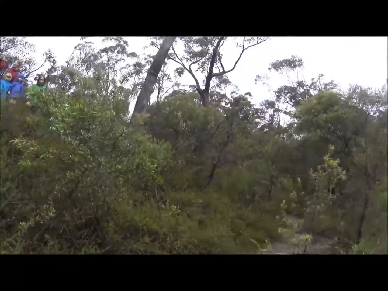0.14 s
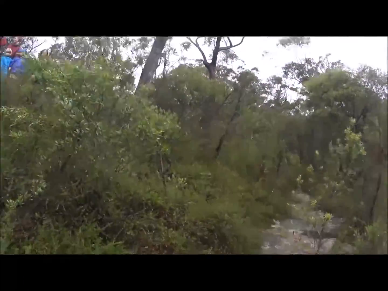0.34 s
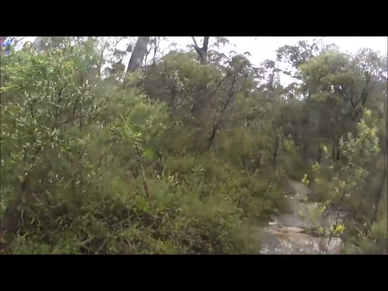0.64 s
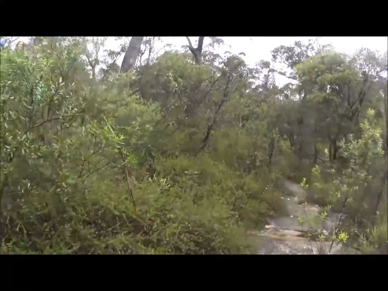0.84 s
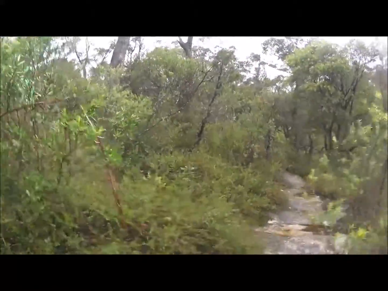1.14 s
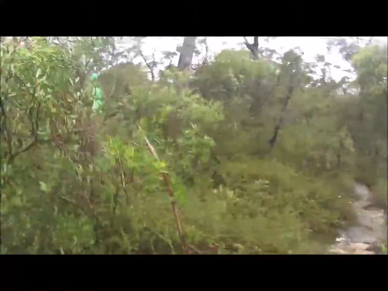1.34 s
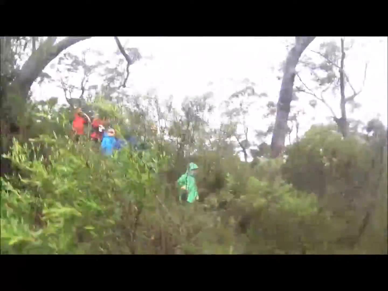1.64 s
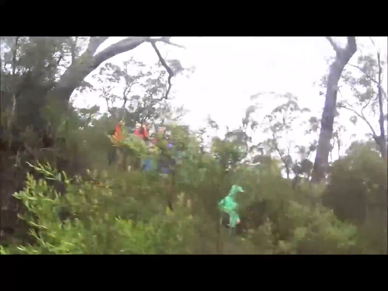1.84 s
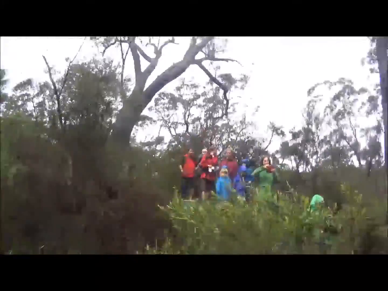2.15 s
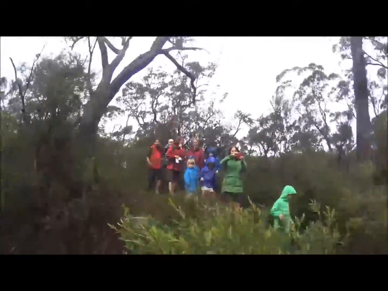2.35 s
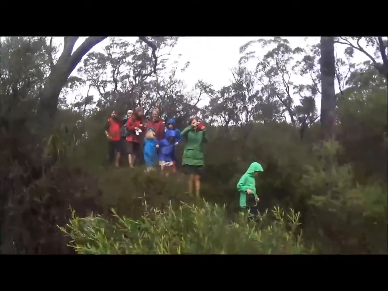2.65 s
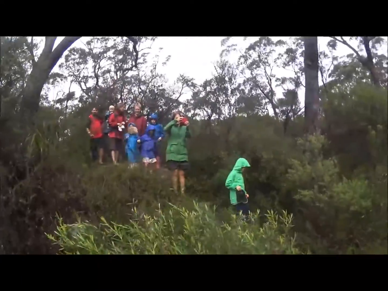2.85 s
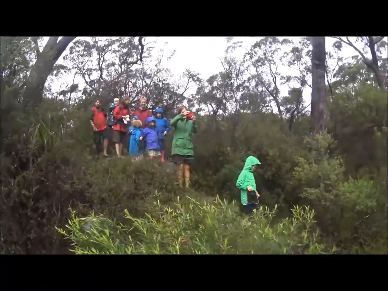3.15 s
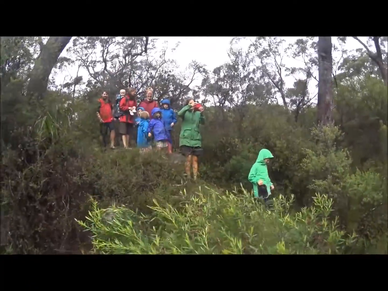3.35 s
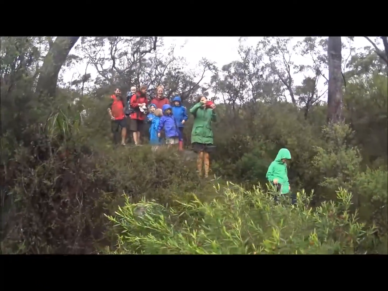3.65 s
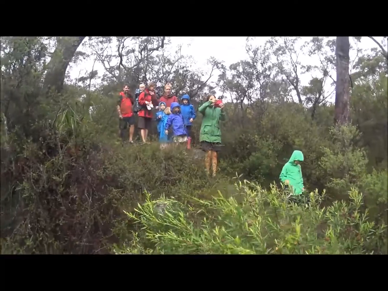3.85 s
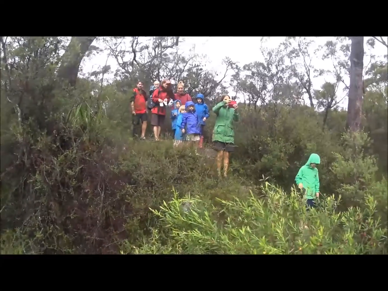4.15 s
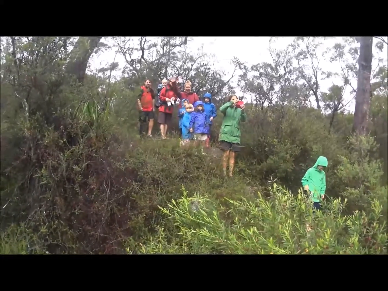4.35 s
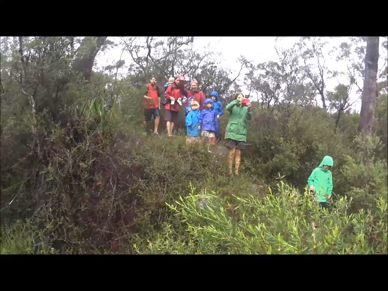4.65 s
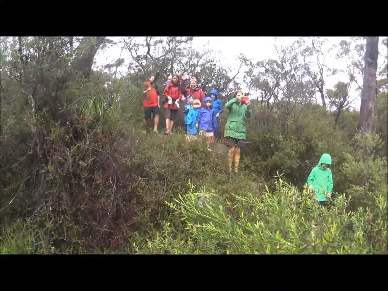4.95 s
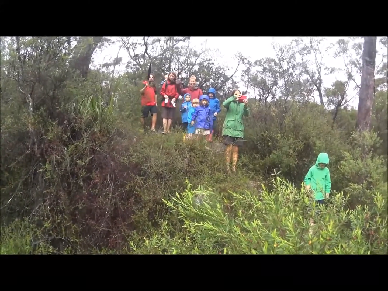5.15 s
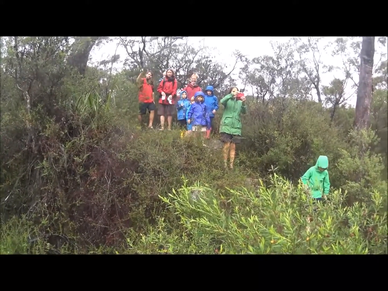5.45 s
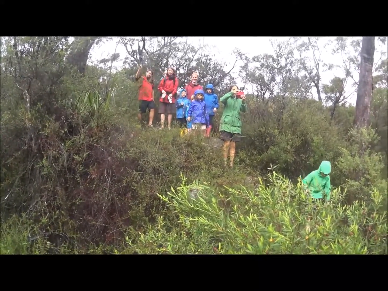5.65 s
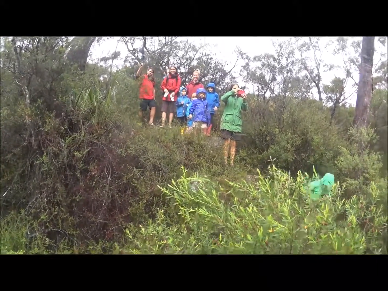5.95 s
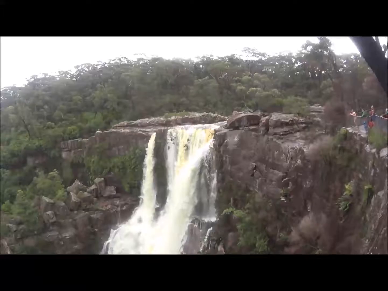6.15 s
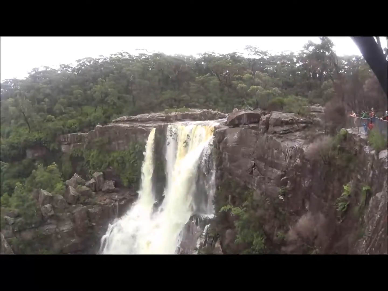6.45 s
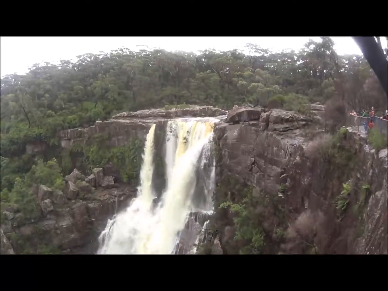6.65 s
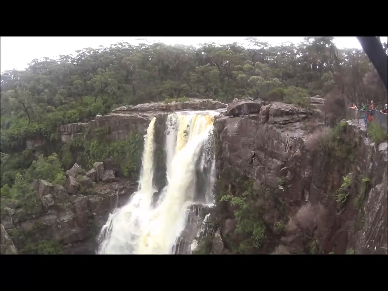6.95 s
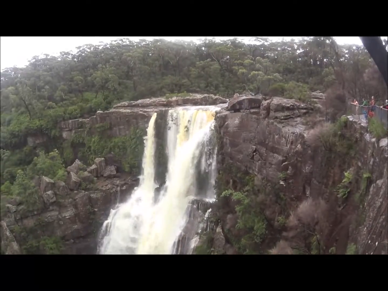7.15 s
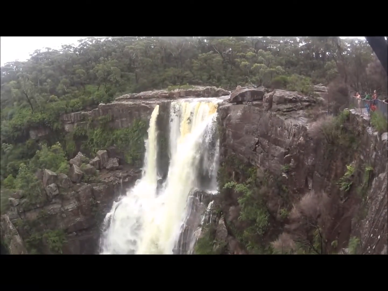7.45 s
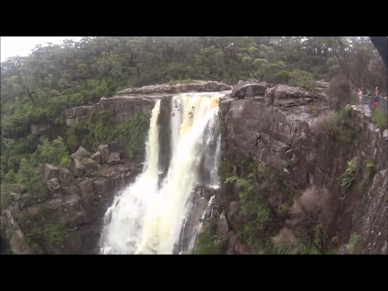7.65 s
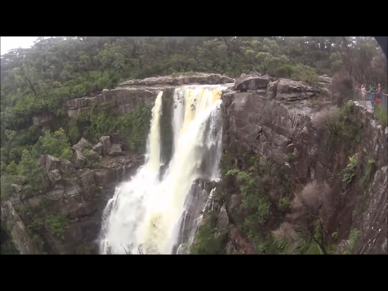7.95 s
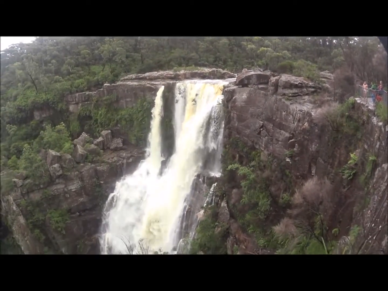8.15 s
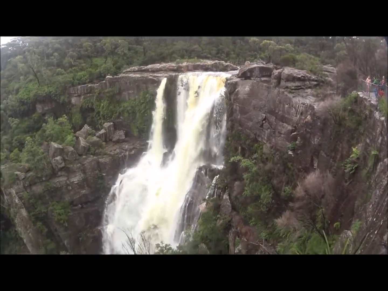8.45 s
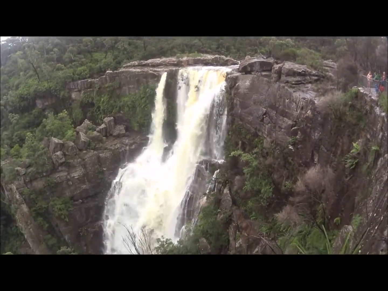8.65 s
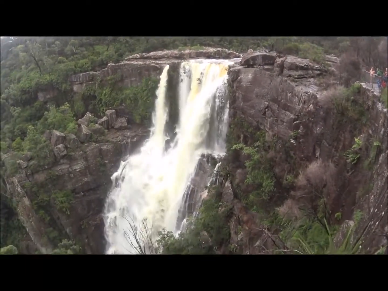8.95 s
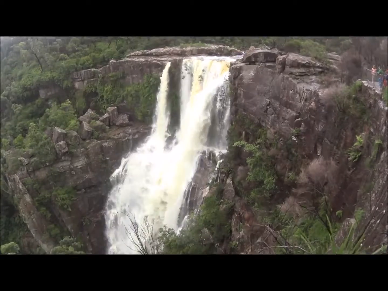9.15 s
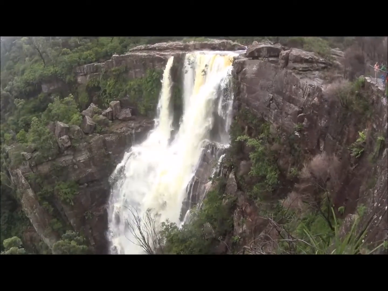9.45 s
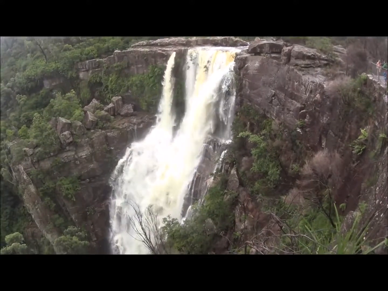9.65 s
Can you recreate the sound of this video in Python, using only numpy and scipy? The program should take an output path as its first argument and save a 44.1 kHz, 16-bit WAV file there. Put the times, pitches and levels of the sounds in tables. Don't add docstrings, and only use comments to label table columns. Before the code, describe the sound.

Quiet far-off water hiss with handling knocks and scuffs on a plastic camera, cutting suddenly to the full, even rush of nearby falls.

```python
import sys
import numpy as np
from scipy import signal
from scipy.fft import rfft, irfft, next_fast_len
from scipy.io import wavfile
from scipy.ndimage import uniform_filter1d, map_coordinates

SR = 44100
rng = np.random.default_rng(int(sys.argv[2]) if len(sys.argv) > 2 else 0)


def generate_wav(signal):
    frames = np.transpose(np.atleast_2d(signal))
    scaled = np.clip(frames, -1, 1) * 32767
    pcm = np.round(scaled).astype(np.int16)
    wavfile.write(sys.argv[1], SR, pcm)


def field_ratio(decibels):
    return 10 ** (np.asarray(decibels, dtype=float) / 20)


N = 432621
CUT = 6.1428
SPLIT = round(CUT * SR)
HANDLED = int(2.6 * SR)


def unit(x):
    return x / np.sqrt(np.mean(x ** 2) + 1e-20)


def curves(rows, outside=None):
    s, *cols = np.transpose(rows)
    t = np.arange(N) / SR
    return [np.interp(t, s, c, outside, outside) for c in cols]


def wobble(rate, count=N):
    knots = rng.standard_normal(int(N * rate / SR) + 4)
    return map_coordinates(knots, [np.arange(count) * rate / SR])


def filtered(x, response):
    m = next_fast_len(x.shape[-1] + 8192)
    spectrum = rfft(x, m) * response(np.fft.rfftfreq(m, 1 / SR))
    return irfft(spectrum, m)[..., :x.shape[-1]]


def modes(table):
    def response(f):
        total = 0
        for k, (hz, width, db) in enumerate(table):
            total = total + (-1) ** k * field_ratio(db) * 1j * f * width / (hz * hz - f * f + 1j * f * width)
        return total
    return response


def churn(patchy_db, count):
    z = signal.stft(rng.standard_normal((2, count + 512)), nperseg=512)[2]
    field = uniform_filter1d(rng.standard_normal(z.shape[1:]), size=8, axis=0)
    field = uniform_filter1d(field, size=10, axis=1)
    noise = signal.istft(z * field_ratio(patchy_db * unit(field)), nperseg=512)[1]
    return unit(noise[:, :count])


def falls(view, patchy_db, bass_slope, count):
    hz, *cols = np.transpose(view)

    def read(f, k):
        return np.interp(np.log(f + 1), np.log(hz), cols[k])

    def sharing(f):
        angle = np.arccos(np.clip(read(f, 2), 0, 1)) / 2
        return np.array([np.cos(angle), np.sin(angle)])

    def ports(f):
        bass = np.minimum(1, f / hz[0]) ** bass_slope
        lead = np.exp(.5j * np.outer([1, -1], read(f, 3)))
        return bass * field_ratio([read(f, 0), read(f, 1)]) * lead

    shared, own = filtered(churn(patchy_db, count), sharing)
    return field_ratio(-21.5) * filtered(np.array([shared + own, shared - own]), ports)


# [f/Hz, left level/dB, right level/dB, likeness/0-1, left lead/rad]
FACING_VIEW = [(90, -0.5, -0.5, 0.9, 0.045), (260, 2.5, 5, 0.98, 0.017), (655, -3.5, -2, 0.85, -0.44),
               (1040, -3.5, 0.5, 0.55, -0.71), (1270, 3.5, 8, 0.8, -0.32), (1600, -5.5, -3.5, 0.1, 0.46),
               (2070, -4.5, -5.5, 0.7, -0.26), (2550, 3.5, 8.5, 0.67, -0.79),
               (3500, -2.5, 1.8, 0.34, -0.35), (4400, 0, 2, 0.9, 0.05), (6020, 0.2, 4.5, 0.4, -0.14),
               (6440, -6.5, -2, 0.2, -1.06), (9400, -14, -11, 0.34, -0.057), (11100, -13, -11.5, 0.7, -0.2)]
# [f/Hz, left level/dB, right level/dB, likeness/0-1, left lead/rad]
TURNED_VIEW = [(90, -2.5, -1, 0.95, -0.07), (300, -1, 1.4, 0.96, 0.3), (690, -3.5, -0.9, 0.91, 0.37),
               (1100, 0.5, 4.5, 1, 0.9), (1710, -5.5, -1, 0.14, -3), (1820, -2.5, -3, 0.97, 2.1),
               (1940, -2, -2, 0.86, -2.4), (2540, -3.5, -8, 0.8, 1.3), (3700, 4, 2.5, 0.17, -3.5),
               (4200, -2, -2.5, 0.54, 1), (6200, 3, 0.98, 0.51, 0.3), (7430, 0, -3, 0.16, -0.8),
               (8440, -2.5, -3.5, 0.3, -0.1), (11600, -17.5, -17, 0.32, -0.3)]
# [t/s, turned away/0-1, level/dB, treble level under the hand/dB]
SWING_PATH = [(0, .02, -0.2, 0.5), (1.1, 0.05, -0.5, 0.2), (1.3, 0.65, 1.7, -4.5), (1.44, 0.06, -0.8, -0.8),
              (1.8, 0.75, 2, -4), (2.02, 0.96, -1.1, -1.5), (2.25, 0.74, .1, -4.5),
              (2.42, 0.93, -0.7, -1.1), (2.75, 0.96, -0.4, -1.6), (3.2, 0.95, -0.24, 1.7),
              (6.14, 0.93, 0.6, -0.8)]


def far_falls():
    turned, level_db, treble_db = np.array(curves(SWING_PATH))[:, :SPLIT]
    turned = np.clip(turned, 0, 1)
    facing = falls(FACING_VIEW, patchy_db=1.17, bass_slope=1.6, count=SPLIT)
    away = falls(TURNED_VIEW, patchy_db=0.4, bass_slope=0.77, count=SPLIT)
    mix = np.sqrt(1 - turned) * facing + np.sqrt(turned) * away
    treble = filtered(mix, lambda hz: np.clip((hz - 6200) / 1200, 0, 1))
    shading = field_ratio(treble_db + 0.27 * wobble(7, count=SPLIT)) - 1
    level = field_ratio(level_db + 0.16 * wobble(6.7, count=SPLIT))
    return (mix + treble * shading) * level


# [t/s, level/dB]
WIND_LEVEL = [(0, -57), (1, -59), (1.9, -39), (2.2, -31), (2.4, -37), (2.75, -40), (2.9, -50), (3.5, -44),
              (4.3, -54), (5.6, -53), (6.1, -37), (6.16, -57), (8, -53), (9, -59), (9.81, -52)]
# [f/Hz, level/dB]
WIND_TONE = [(12, -14), (25, 9), (60, 10.5), (110, -1), (200, -30), (400, -70)]


def wind():
    hz, db = np.transpose(WIND_TONE)
    air = filtered(rng.standard_normal((2, N)), lambda f: field_ratio(np.interp(np.log(f + 1), np.log(hz), db)))
    left = 0.78 * air[0] + 0.15 * air[1]
    right = 1.3 * air[0] - 0.15 * air[1]
    lumpy = np.array([left, right]) * field_ratio(2 * wobble(12))
    return field_ratio(curves(WIND_LEVEL)[0]) * unit(lumpy)


# [t/s, peak level/dB, f/Hz, time to fall 60 dB/s, left-right level/dB]
FINGER_TAPS = [(1.1295, -12, 2000, 0.0099, -1.1), (1.1386, -17, 1820, .014, 13),
               (1.145, -11.5, 1900, 0.01, -6), (1.154, -9, 1200, 0.0065, -7),
               (1.2024, -5.5, 1150, 0.0039, 5), (1.203, -18, 2300, .0035, 7),
               (1.347, -24, 1000, .012, -1.5), (1.369, -19, 850, 0.015, -1.5),
               (1.417, -16, 1790, 0.012, -6), (1.4167, -24, 2400, .006, -1.1),
               (2.0572, -15, 1100, 0.025, 3), (2.0838, -7, 750, 0.0032, -10), (2.084, -18, 1700, .004, -3),
               (2.1476, -12.5, 1220, .019, -16), (2.148, -16, 1280, .014, -3),
               (2.152, -16, 1350, 0.0096, 1.1), (2.151, -17, 1900, 0.021, -2.2),
               (2.152, -27, 4900, 0.012, .1), (6.0013, -4.5, 1100, 0.0031, 2.2),
               (6.0013, -10, 503, 0.0083, -4), (6.0014, -29, 2010, 0.0036, -1.1),
               (6.003, -16, 1360, .0063, -1.1)]
# [t/s, peak level/dB, f/Hz]
PALM_BUMPS = [(.333, -25, 129), (0.401, -20, 220), (1.1383, -9.5, 400), (1.1535, -17, 320),
              (1.383, -20, 248), (1.416, -17, 300), (1.603, -20, 300), (1.96, -18, 160), (2.062, -9.5, 151),
              (2.092, -16, 200), (2.125, -12, 224), (2.165, -31, 260), (2.26, -36, 70), (2.309, -18, 150),
              (2.33, -14, 300), (2.375, -13, 252), (2.545, -32, 90), (2.604, -29, 100), (2.74, -25, 109),
              (3.14, -26, 200), (3.755, -21, 206), (3.843, -24, 199), (3.909, -20.5, 190),
              (3.993, -22.5, 171), (5.651, -24, 109), (5.892, -11, 198), (5.9342, -13.5, 300),
              (5.938, -22, 120)]


def knocks():
    bump_cycles, bump_pan_db = 4, -4
    bumps = [(s, db, hz, bump_cycles / hz, bump_pan_db) for s, db, hz in PALM_BUMPS]
    out = np.zeros((2, N + SR))
    t = np.arange(SR // 10) / SR
    for s, db, hz, t60, pan_db in list(FINGER_TAPS) + bumps:
        decay = field_ratio(db + 7.0 - 60 * t / t60)
        swing = np.sin(2 * np.pi * hz * t) * decay * (1 - np.exp(-t * hz * 4))
        start = round(s * SR)
        out[:, start:start + len(t)] += swing * field_ratio([[pan_db / 2], [-pan_db / 2]])
    return out[:, :N]


def slips(rate, spread_db, apart):
    size = field_ratio(spread_db * rng.standard_normal((3, HANDLED))) * rng.standard_normal((3, HANDLED))
    push = (rng.random((3, HANDLED)) < rate / SR) * size
    return push[0] + apart * push[1:]


# [t/s, pressure level/dB, place from back wall 0 to ports 1]
FIRST_STROKES = [
    [(1.06, -41, .5), (1.124, -29, 0.48), (1.138, -22, 0.4), (1.152, -30, 0.37), (1.162, -25, .3)],
    [(1.32, -36, .2), (1.36, -26.5, 0.14), (1.4, -37, 0.33), (1.422, -29, 0.46), (1.445, -34, .8)],
    [(1.55, -37, 0.47), (1.6, -20.5, 0.54), (1.613, -25, .35), (1.632, -19.5, 0.24), (1.69, -21, 0.74),
     (1.74, -18.5, 0.51), (1.79, -21.5, 0.6), (1.822, -26.5, 0.67)],
    [(1.822, -28, .6), (1.86, -23.5, 0.61), (1.89, -19.5, .35), (1.925, -16, 0.48), (1.942, -19, 0.36),
     (1.95, -24, .1), (1.968, -33, .1)],
]
# [t/s, pressure level/dB, place from back wall 0 to ports 1]
LATER_STROKES = [
    [(2.03, -32, .45), (2.057, -23.5, .75), (2.098, -31, 0.62), (2.12, -21.5, 0.82), (2.153, -19, 0.34),
     (2.16, -37, 0.45), (2.18, -28, 0.73), (2.195, -42, .5)],
    [(2.297, -32, 0.27), (2.31, -19.5, 0.44), (2.35, -17, 0.73), (2.362, -21, 0.36), (2.385, -21.5, 0.46),
     (2.42, -22, 0.53), (2.47, -28.5, 0.54), (2.52, -38, .55)],
]
# [f/Hz, width/Hz, level/dB]
CAVITY_MODES = [(1236, 390, .1)]
SHELL_MODES = [(680, 380, -0.5), (1060, 120, 1.5), (1330, 200, -3)]
WALL_MODES = [(179, 110, -1.5), (363, 200, -4), (530, 170, -5)]
RIM_MODES = [(1750, 360, 0.1)]
PORT_MODES = [(2180, 220, 1.5), (2700, 580, 0.5), (3620, 370, -10)]


def rubbing():
    reach_db = 18
    strokes = FIRST_STROKES + LATER_STROKES
    pressure_db = np.max([curves(s, -90)[0] for s in strokes], axis=0)[:HANDLED]
    place = curves(sum(strokes, []))[1][:HANDLED]
    clump_db = 0.39 * wobble(70, count=HANDLED)
    # modes, slips a second, left-right dB, unlikeness of the ports, place, dB
    parts = ((CAVITY_MODES, 2500, -1.1, .5, .55, -1.4),
             (SHELL_MODES, 1800, -1.5, .6, .2, -4.5),
             (WALL_MODES, 700, -4, .3, .01, -5),
             (RIM_MODES, 2000, -.6, .5, .62, -5.5),
             (PORT_MODES, 3000, -.6, .7, .99, -1.1))
    out = np.zeros((2, SPLIT))
    for table, rate, pan_db, apart, home, own_db in parts:
        body = modes(table)

        def steep(f):
            lead = np.exp(np.outer([-.5j, .5j], np.exp(-((f - 700) / 350) ** 2)))
            return lead * body(f) * np.abs(body(f)) ** 0.53

        pushes = slips(rate, 2.4, apart)
        level_db = pressure_db + own_db - reach_db * (place - home) ** 2
        level_db = level_db + clump_db + 0.51 * wobble(40.27, count=HANDLED)
        gain = field_ratio(level_db) / np.std(filtered(pushes[:, :SR], steep).mean(0))
        out[:, :HANDLED] += filtered(pushes * gain, steep) * field_ratio([[pan_db / 2], [-pan_db / 2]])
    return out


# [t/s, held/s, depth level/dB]
GAIN_DIPS = [
    (1.142, .012, -11),
    (1.198, .006, -5),
    (1.602, 0.0074, -8),
    (1.905, 0.042, -7),
    (2.136, 0.021, -13),
]


def ducking():
    t = np.arange(SPLIT) / SR
    dips = []
    for start, held, db in GAIN_DIPS:
        fall = np.clip((t - start) / 0.0014, 0, 1)
        recovery = np.exp(-np.maximum(t - start - held, 0) / 0.018)
        dips.append(db * fall * recovery)
    return field_ratio(np.min(dips, axis=0))


# [t/s, f/Hz, level/dB]
SQUEAK_PATH = [(1.95, 6200, -40), (1.956, 5700, -25), (1.965, 4200, -46), (1.972, 3300, -30),
               (1.98, 2900, -25), (1.984, 2800, -45)]


def squeak():
    hz, level_db = curves(SQUEAK_PATH, -120)
    tone = np.sin(2 * np.pi * np.cumsum(hz) / SR)
    return (field_ratio(level_db) * tone)[:SPLIT]


# [f/Hz, left level/dB, right level/dB, likeness/0-1, left lead/rad]
CLIFF_VIEW = [(149, 3.5, 5, 0.91, 0.028), (282, -1, 1, 0.89, 0.035), (400, 4, 5, 0.91, -.1),
              (664, -4, -0.3, .78, -0.1), (1000, -0.5, 2, 0.82, -0.77), (1194, 6.5, 12.5, 0.93, -0.44),
              (1860, 9, 7, .87, -0.61), (2340, 10, 16, 0.87, -1.23), (3780, 8.5, 7.5, 0.98, 0.87),
              (4540, 12, 12.5, 0.93, -0.37), (5500, 9, 8, 1, -1), (5920, 11.5, 10.5, 0.99, 0.98),
              (6580, 3.5, 5, 0.63, 0.16), (9500, -0.5, -1.5, 0.84, -0.16)]
# [t/s, level/dB, left-right level/dB]
CLIFF_DRIFT = [(6.14, 1.3, -1), (7, 1.5, -0.5), (8, 1.2, -0.6), (9, 1, -0.2), (9.81, 1.2, 0)]


def near_falls():
    level_db, pan_db = curves(CLIFF_DRIFT)
    surge_db = 0.1 * wobble(12) + 0.24 * wobble(6.1)
    gain = field_ratio(level_db + surge_db + np.outer([.5, -.5], pan_db))
    return falls(CLIFF_VIEW, patchy_db=0.63, bass_slope=1.5, count=N - SPLIT) * gain[:, SPLIT:]


def scene():
    bush = far_falls() * ducking() + knocks()[:, :SPLIT] + rubbing() + squeak()
    return np.hstack([bush, near_falls()]) + wind()


def top_cut(x):
    return signal.sosfilt(signal.butter(12, 11300, fs=SR, output="sos"), x)


def record(dry):
    capped = dry / (1 + np.abs(dry / .9) ** 6) ** (1 / 6)
    mix = filtered(capped, lambda hz: np.clip((11050 - hz) / 60, 0, 1))
    return top_cut(mix)


dry = scene()
out = record(dry)
generate_wav(out)
```